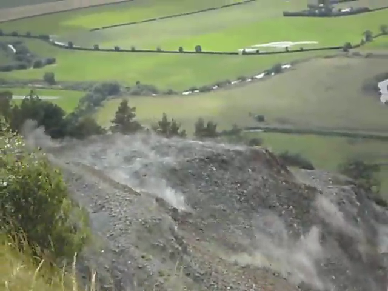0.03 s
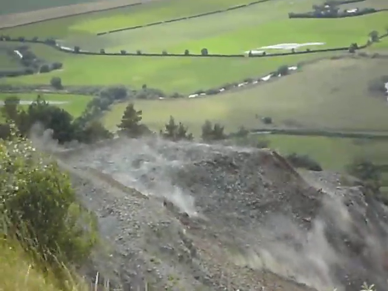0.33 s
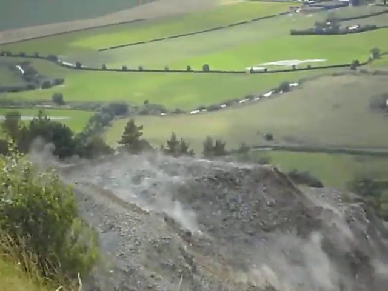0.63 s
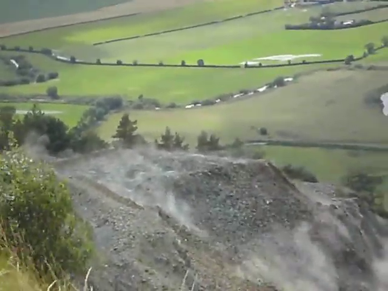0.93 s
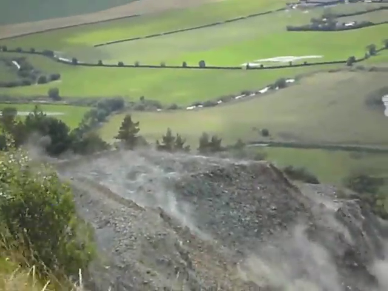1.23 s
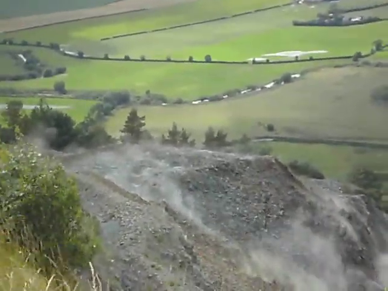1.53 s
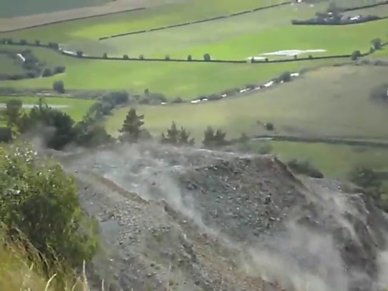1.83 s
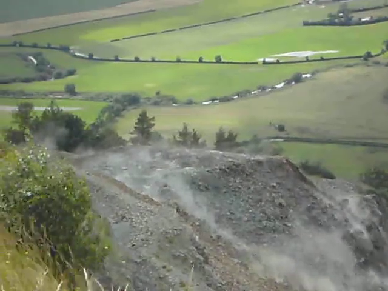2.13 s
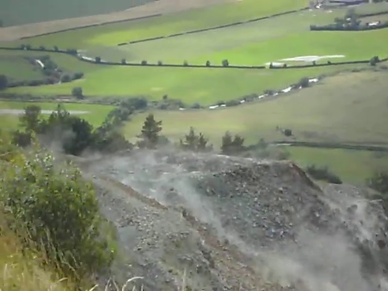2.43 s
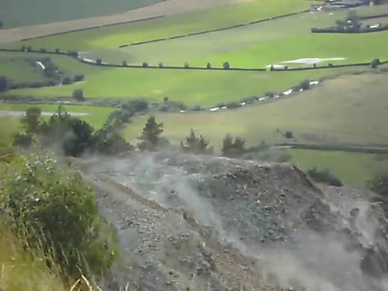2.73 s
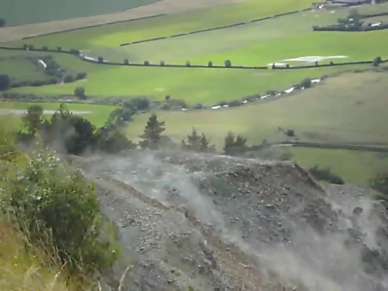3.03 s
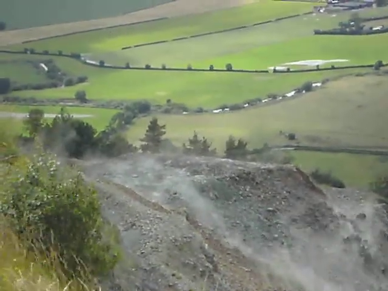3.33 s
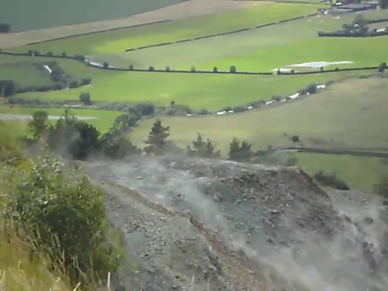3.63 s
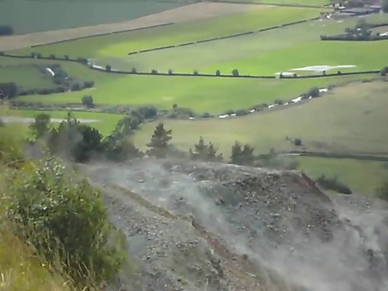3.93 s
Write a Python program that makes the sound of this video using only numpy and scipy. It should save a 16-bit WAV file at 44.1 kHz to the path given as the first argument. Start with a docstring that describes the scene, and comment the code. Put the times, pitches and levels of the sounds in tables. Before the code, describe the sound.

A continuous rumble of tumbling rock and hissing gravel, with a few brief clicks.

```python
"""Blasted rock slides down a quarry face, heard from far across the pit. From the start, boulder knocks
merge into a roar over deep thuds, and gravel into a hiss hollowed by a shifting ground reflection;
a machine whines faintly behind. The slide swells around 0.5 s, and its sharpest peaks overload the
narrow-band recorder with tiny clicks, thick until 0.6 s, then scattered. Soft wind brushes the
microphone at 0.5 s and 2 s. The roar rolls on in surges and eases a little towards 4 s."""
import sys
import numpy as np
from scipy import signal
from scipy.fft import rfft, irfft
from scipy.io import wavfile

SR = 44100
rng = np.random.default_rng(int(sys.argv[2]) if len(sys.argv) > 2 else 0)


def output_pcm(signal):
    """Save a mono or channel-first signal as 16-bit PCM at the path in sys.argv[1].

    Samples are clipped to [-1, 1] before scaling.
    """
    pcm = np.clip(np.atleast_2d(signal).T, -1, 1) * 32767
    wavfile.write(sys.argv[1], SR, np.round(pcm).astype(np.int16))


N = 176400


def from_db(db):
    """Decibels to gain."""
    return 10 ** (np.asarray(db) / 20)


def rms_one(x):
    """Scale to rms 1."""
    return x / np.sqrt(np.mean(x ** 2) + 1e-20)


def in_time(rows, column=1):
    """One column of an automation curve at every sample."""
    columns = np.transpose(rows)
    return np.interp(np.arange(N) / SR, columns[0], columns[column])


def colour(x, points):
    """EQ by a table of f/Hz, gain/dB, with steep skirts beyond its ends."""
    hz, db = np.transpose(points)
    f = np.maximum(np.arange(N // 2 + 1) * SR / N, 1)
    skirts = np.minimum(f / hz[0], 1) ** 4 * np.minimum(hz[-1] / f, 1) ** 8
    return irfft(rfft(x) * skirts * from_db(np.interp(np.log(f), np.log(hz), db)), N)


def drift(rate_hz):
    """A slow random modulator with spread 1."""
    hop, settle = 100, 2000
    pole = np.exp(-2 * np.pi * rate_hz * hop / SR)
    noise = rng.standard_normal(N // hop + settle + 2)
    slow = signal.lfilter([1], [1, -2 * pole, pole * pole], noise)[settle:]
    return np.interp(np.arange(N) / hop, np.arange(len(slow)), rms_one(slow - slow.mean()))


def impacts(spectrum, per_s, spread_db):
    """A dense shower of collisions of random size, each with the given spectrum; rms 1."""
    hits = rng.random(N) < per_s / SR
    sizes = from_db(spread_db * rng.standard_normal(N)) * rng.choice([-1, 1], N)
    return rms_one(colour(hits * sizes, spectrum))


def wind():
    """Soft, bassy puffs of air brush the microphone."""
    puffs = [(.5, .1, -51.5), (2.0, .07, -46)]  # bell-shaped swells: t/s, half length/s, level/dB
    puff_eq = [(30, -4.5), (70, 0), (110, -5.5)]  # tone of the buffeting: f/Hz, gain/dB
    t = np.arange(N) / SR
    swell = sum(from_db(db) * np.exp(-((t - at) / width) ** 2) for at, width, db in puffs)
    return swell * rms_one(colour(rng.standard_normal(N), puff_eq))


def machine():
    """A steady far whine whose partials fade in and out on the wind."""
    partials = [(3, -31, -33.5), (4, -48.5, -46.5), (5, -34.5, -41.5), (6, -43, -40), (7, -47.5, -46),
                (8, -46, -38), (9, -44, -48.5), (10, -48, -45), (11, -53, -51.5)]  # overtones: harmonic number, start level/dB, end level/dB
    pitch_hz, wobble_hz, fade_db = 307.6, 0.2, 4.5
    phase = 2 * np.pi * np.cumsum(pitch_hz + wobble_hz * drift(rate_hz=2)) / SR
    whine = 0
    for harmonic, start_db, end_db in partials:
        fading = from_db(fade_db * drift(rate_hz=1.2))
        tone = np.sin(harmonic * phase + 2 * np.pi * rng.random())
        whine = whine + from_db(np.linspace(start_db, end_db, N)) * rms_one(fading * tone)
    return whine


def rumble(gain_db=1):
    """The low end: the heaviest blocks thud on the heap."""
    flow = [(0.0, -33.5), (0.7, -31), (1.2, -32), (1.6, -33.5), (2.0, -32), (2.4, -34), (2.8, -32),
            (3.15, -35), (3.4, -31), (3.65, -38), (4.0, -37)]  # surges of falling blocks: t/s, relative level/dB
    thud_eq = [(25.0, -29), (40.0, -27), (70.0, -17.5), (90.0, -18.5), (130.0, -11.5), (180.0, -4.5),
               (220.0, -4), (255.0, -6.5), (315.0, -0.5), (360.0, -1)]  # tone of a thud: f/Hz, gain/dB
    return from_db(gain_db + in_time(flow)) * impacts(thud_eq, per_s=1200, spread_db=3)


def gravel(gain_db=-0.4):
    """Small stones hiss, brighter as the flow grows; a ground reflection combs the sound."""
    flow = [(0.0, -21), (0.2, -19.5), (0.35, -17.5), (0.62, -17.5), (0.75, -20), (0.97, -22.5),
            (1.18, -21.5), (1.35, -17.5), (1.58, -21), (1.85, -20), (2.15, -20), (2.4, -21.1),
            (2.65, -19.5), (2.92, -18), (3.3, -20), (3.55, -20), (3.82, -22.0), (4.0, -22.5)]  # surges of sliding gravel: t/s, relative level/dB
    stone_eq = [(1350.0, -7), (1550.0, -2.4), (1700.0, -2.5), (1900.0, 1.5), (2150.0, 0), (2450.0, -1),
                (2700.0, -2.5), (3000.0, -8), (3280.0, -11), (3480.0, -14), (3750.0, -13.5),
                (4000.0, -25.5), (4220.0, -28.5), (4450.0, -45)]  # tone of a stone's tick: f/Hz, gain/dB
    top_eq = [(2600, -12), (3600, -1), (4400, 0)]  # the treble that swells most with the flow: f/Hz, gain/dB
    bounce = [(0.0, 1.42, 4.3), (0.2, 1.49, 1), (0.45, 1.38, 0.6), (0.8, 1.346, -4.5), (1.15, 1.3, 0.5),
              (1.6, 1.271, -1.5), (2.1, 1.246, 3), (2.6, 1.26, 1.2), (3.3, 1.21, 1.2), (4.0, 1.25, 1)]  # ground reflection: t/s, lag/ms, gain/dB on top of its EQ
    bounce_eq = [(1400, -32), (1950, -17), (2400, -5), (3000, -6.5), (3400, -7.5), (4000, -20.5)]  # tone of that reflection: f/Hz, gain/dB
    flow_db = in_time(flow)
    stones = impacts(stone_eq, per_s=14000, spread_db=2)
    top_gain = from_db(0.32 * (flow_db - flow_db.mean()))
    direct = stones + colour(stones, top_eq) * (top_gain - 1)
    # The lag mostly shrinks, so the comb's notches glide upward.
    n, lag = np.arange(N), in_time(bounce) * SR / 1000
    delayed = np.interp(n - lag, n, colour(direct, bounce_eq))
    reflected = from_db(in_time(bounce, column=2)) * delayed
    return from_db(gain_db + flow_db) * rms_one(direct + reflected)


def boulders(gain_db=0.22):
    """The body of the roar: tumbling rocks knock together, too many to tell apart."""
    flow = [(0.0, -14.5), (0.2, -15.5), (0.45, -12.5), (0.68, -13.5), (0.8, -15.1), (1.15, -15.5),
            (1.33, -16), (1.55, -15), (1.75, -14), (2.0, -15.5), (2.3, -15), (2.48, -18.5), (2.7, -15.5),
            (2.88, -16), (3.1, -15), (3.28, -16.5), (3.5, -16.5), (4.0, -19.5)]  # surges of tumbling rock: t/s, relative level/dB
    knock_eq = [(380.0, -14.5), (450.0, -6), (500.0, -7), (570.0, -1), (700.0, 0.5), (770.0, -1.1),
                (840.0, -0.66), (950.0, -5), (1080.0, -8), (1220.0, -14.5), (1350.0, -17.5)]  # tone of a knock: f/Hz, gain/dB
    return from_db(gain_db + in_time(flow)) * impacts(knock_eq, per_s=4000, spread_db=1.5)


def sharp_peaks(roar):
    """At each cue a blip with the roar's own colour brings the tallest nearby crest to a set height."""
    cues = [(0.02, 0.85), (0.0577, 0.73), (0.1333, 0.72), (.226, 0.7), (.272, 0.71), (.315, .72),
            (.3333, 0.77), (0.3933, 0.72), (0.434, 0.73), (0.458, 0.71), (0.461, 0.9), (0.4706, .79),
            (.5011, 0.71), (0.507, 0.76), (.517, 0.73), (0.549, 0.64), (0.5608, .8), (0.567, 0.83),
            (.5929, 0.73), (1.011, 0.71), (1.0927, 0.71), (1.245, 0.68), (1.3386, .81), (1.3477, 0.78),
            (1.988, 0.75), (2.213, 0.73), (2.9501, 0.78), (3.0444, 0.72)]  # transients: t/s, height before clipping/full scale
    reach, near = SR // 200, SR // 1000
    autocorrelation = irfft(np.abs(rfft(roar)) ** 2, N)
    blip = np.roll(autocorrelation, reach)[:2 * reach + 1] * np.hanning(2 * reach + 1)
    out = roar.copy()
    for at, height in cues:
        start = int(at * SR) - near
        crest = start + np.argmax(np.abs(out[start:start + 2 * near]))
        lift = np.sign(out[crest]) * height - out[crest]
        out[crest - reach:crest + reach + 1] += lift * blip / blip[reach]
    return out


def scene():
    """The slide, the machine and the breeze, in mono."""
    return (rumble() + boulders() + gravel() + machine() + wind())[None]


def record(dry):
    """The recorder rounds the crests and keeps a narrow band; added peaks click against its ceiling."""
    knee, knee_room, ceiling, corner = 0.49, 0.097, 0.707, 0.04  # re full scale
    narrow_band = signal.ellip(12, 0.1, 90, 4450, fs=SR, output="sos")
    high_cut = signal.ellip(10, 0.1, 80, 15900, fs=SR, output="sos")
    x = dry[0]
    # Soft saturation, its distortion kept to the mids.
    excess = x - np.clip(x, -knee, knee)
    shaved = excess - knee_room * np.tanh(excess / knee_room)
    rounded = x - colour(shaved, [(300, 0), (3600, 0)])
    peaky = sharp_peaks(signal.sosfilt(narrow_band, rounded))
    # Clipping splashes above the narrow band: the tiny clicks.
    held = np.clip(peaky, corner - ceiling, ceiling - corner)
    clipped = held + corner * np.tanh((peaky - held) / corner)
    return signal.sosfilt(high_cut, clipped)[None]


dry = scene()
out = record(dry)
output_pcm(out)
```